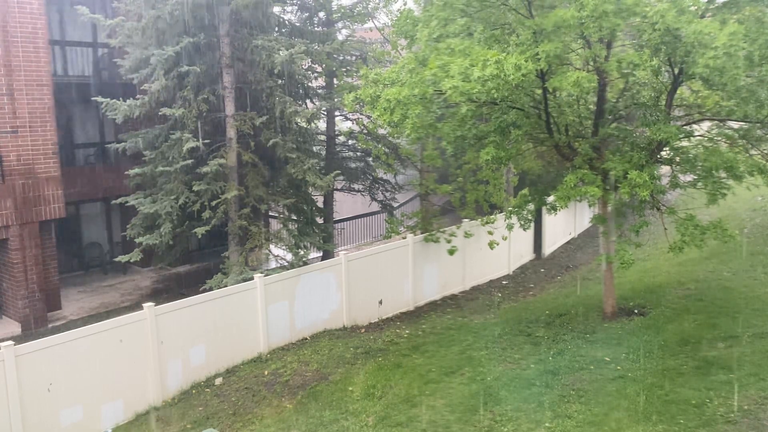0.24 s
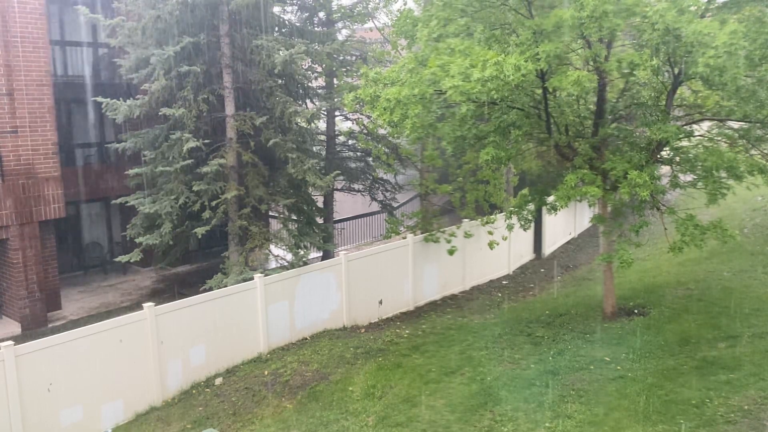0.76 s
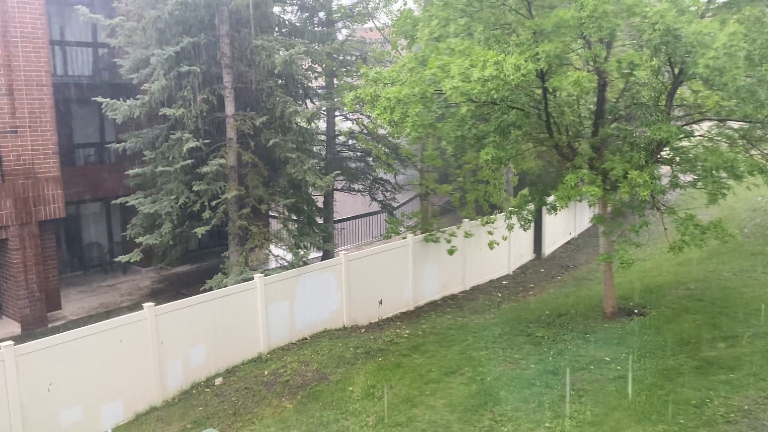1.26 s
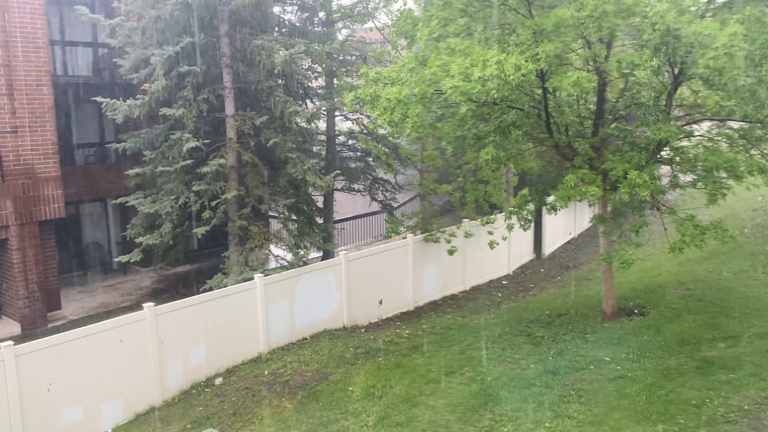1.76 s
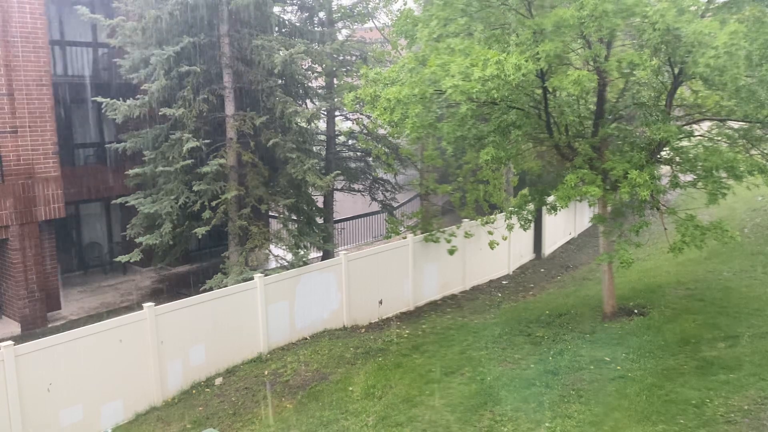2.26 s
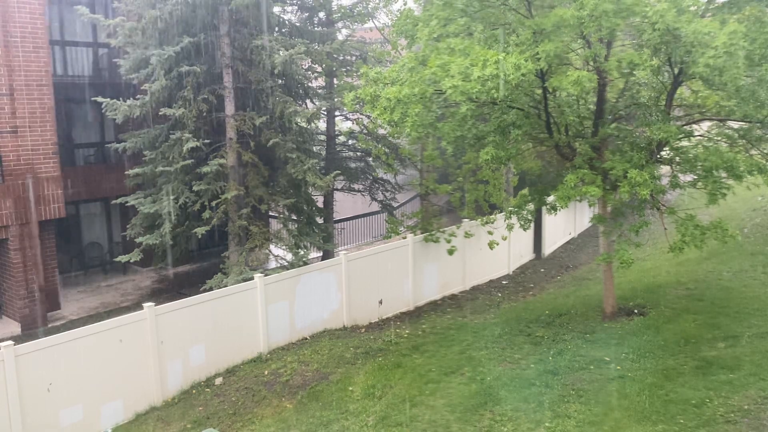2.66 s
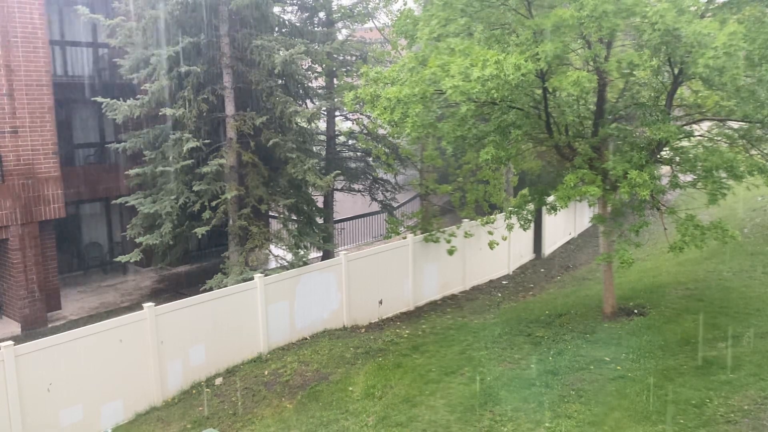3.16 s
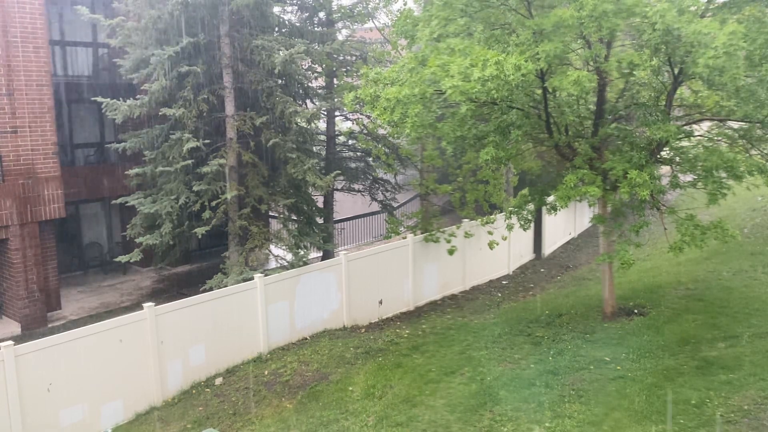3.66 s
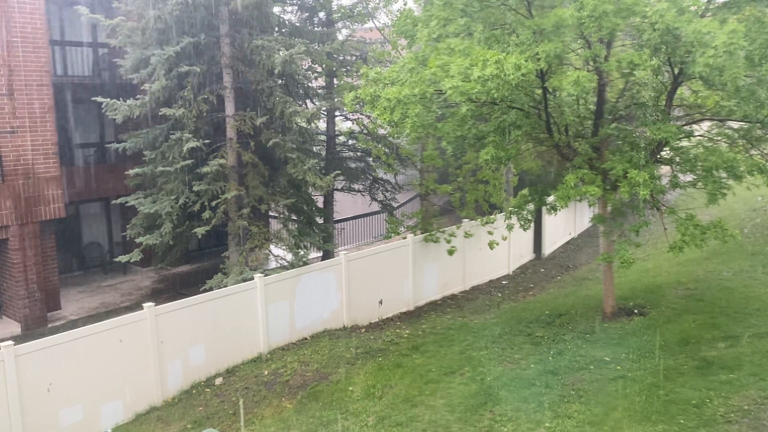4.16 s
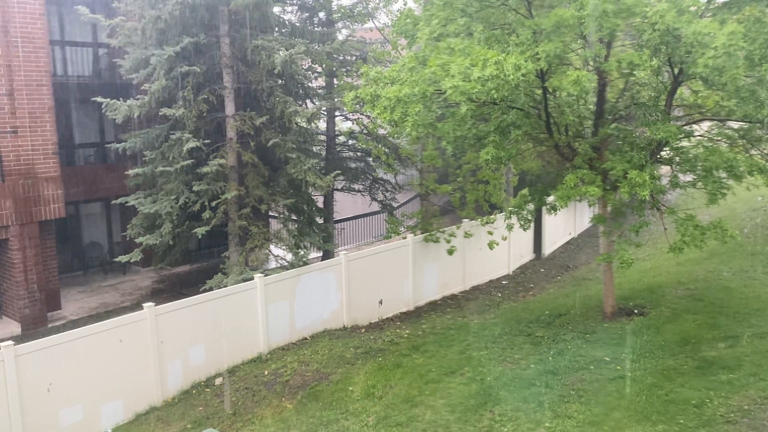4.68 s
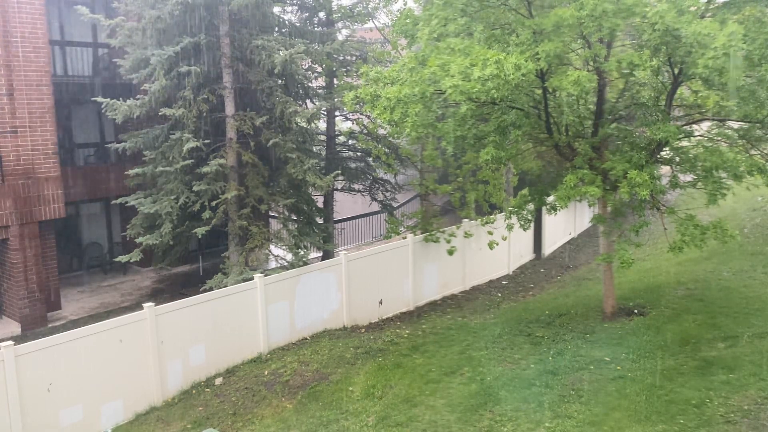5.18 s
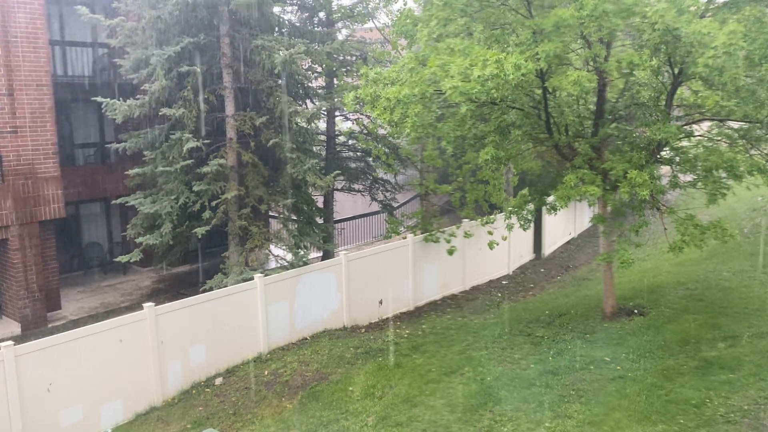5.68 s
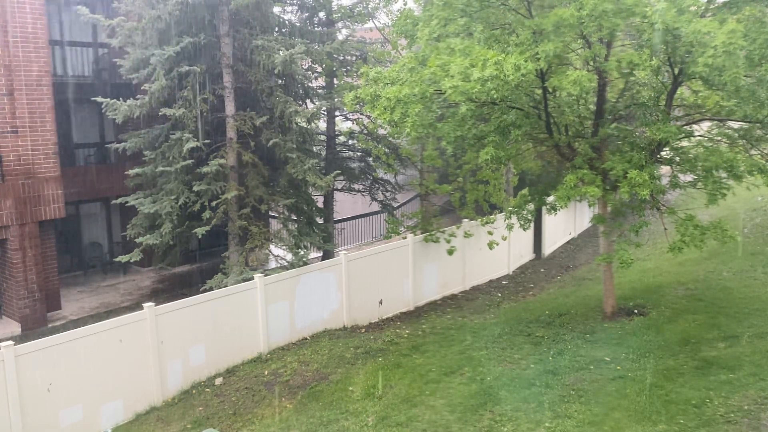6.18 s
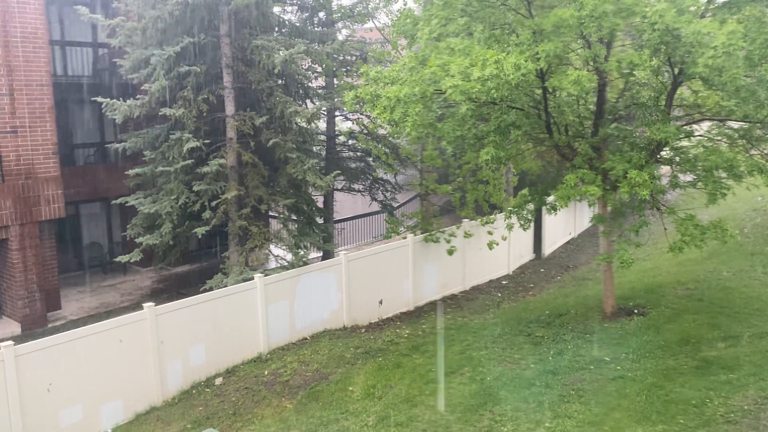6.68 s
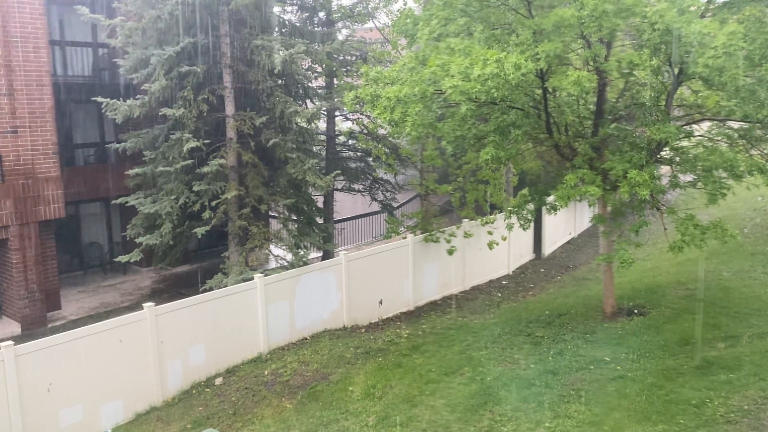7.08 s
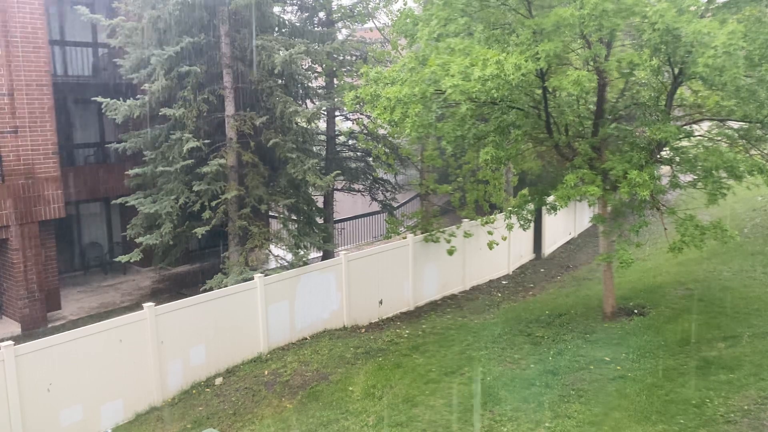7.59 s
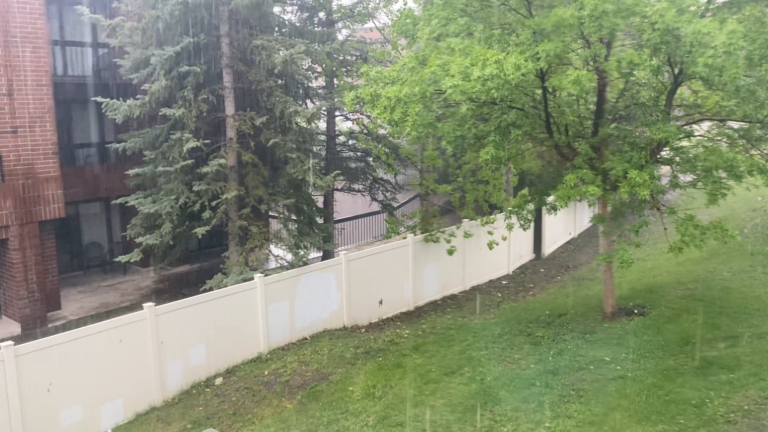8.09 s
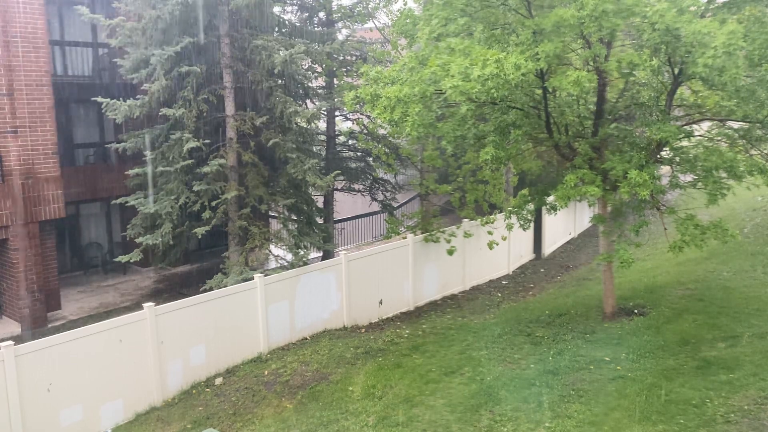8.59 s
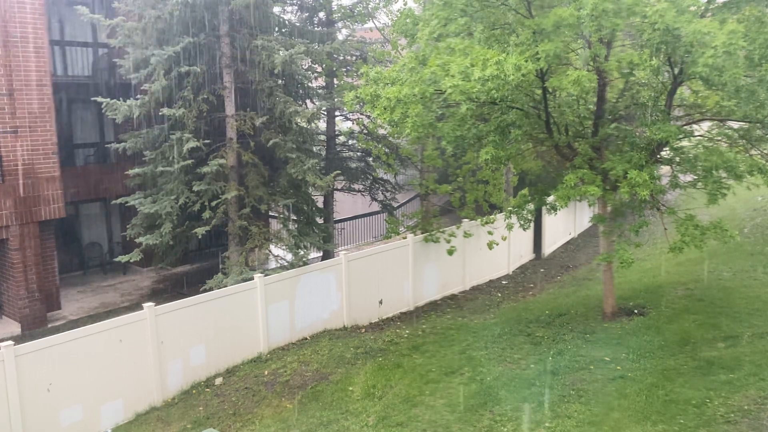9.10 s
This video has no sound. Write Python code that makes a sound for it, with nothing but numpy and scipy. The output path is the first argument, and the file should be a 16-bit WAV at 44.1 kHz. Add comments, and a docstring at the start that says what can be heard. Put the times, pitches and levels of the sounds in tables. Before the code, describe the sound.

A phone above a garden lawn hears continuous rainfall in stereo, slightly hollow in colour. Behind it sits a strong low rumble with brief booms and slow deep swells. Close drops tick and slap at random, clustered at the very start, with a few rising bubble plips through the first five seconds. Late on, a heavy drop knocks resonantly, then a faint thin sizzle passes.

```python
"""Heavy rain on a back garden, heard by a phone above the lawn, over a low town rumble.
Rain and rumble start 2-3 dB high and settle within seconds: filtered noise wash, random patter, noise rumble.
Throughout, close drops knock, slap and spray (damped tones, noise bursts), plips ring and wandering tones boom.
Clear plips come at 1.3-5.0 s, a heavy drop rings its surface at 6.85 s, a thin hiss peaks at 8.24 s.
Hollow resonances colour the rain; the spacing of two microphone ports shapes the stereo of the noise layers."""
import sys
import numpy as np
from scipy import signal
from scipy.fft import rfft, irfft
from scipy.io import wavfile
from scipy.ndimage import uniform_filter1d, map_coordinates

SR = 44100
rng = np.random.default_rng(int(sys.argv[2]) if len(sys.argv) > 2 else 0)


def transcribe(signal):
    """Save signal, clipped to [-1, 1], as a 16-bit WAV file at the path in sys.argv[1]."""
    frames = np.atleast_2d(signal).T
    limited = np.clip(frames, -1, 1)
    pcm = np.round(limited * 32767).astype(np.int16)
    wavfile.write(sys.argv[1], SR, pcm)


N = 412235
TIME = np.arange(N) / SR
HZ = np.maximum(np.arange(N // 2 + 1) * SR / N, 1)


def rain():
    """Far drops merge into a noise wash; duller patter on the lawn and bright patter on leaves join it."""
    # relative spectrum of the rain: (frequency [Hz], level [dB])
    rain_spectrum = [(250, -6), (550, 2.4), (800, -0.5), (1050, -3), (1220, -6.5), (1650, -9),
                     (2550, -11.5), (2800, -11.5), (2950, -15.5), (3300, -16.5), (4400, -22), (5400, -19.5),
                     (6150, -23), (6800, -28), (7900, -24), (8900, -30), (9500, -32.5), (10300, -33),
                     (11200, -33.5)]
    wash = rng.standard_normal((2, N)) * undb(0.25 * walk(9))
    lawn = np.array([patter(per_s=300, spread_db=4.0, largest_db=15.5) for _ in range(2)])
    leaves = np.array([patter(per_s=130, spread_db=5.5, largest_db=16.5) for _ in range(2)])
    # the leaves shed their water in flurries
    leaves = leaves * undb(1.7 * walk(12))
    dull = undb(-3.5) * shape(lawn, resonance(2800, 1900))
    bright = undb(-2.0) * shape(leaves, resonance(7600, 5700))
    coloured = shape(wash + dull + bright, colour(rain_spectrum) * hollow())
    return unit(ports(coloured)) * settle(steady_db=-49, excess_db=2.0, settle_s=2.6)


def patter(per_s, spread_db, largest_db):
    """Drops at random moments, most of them small and a few large, as noise bursts of rms 1."""
    when, size = rng.random((int(per_s * N / SR), 2)).T
    # exponential scatter of mean spread_db, capped
    size_db = np.minimum(-spread_db * np.log(1 - size), largest_db)
    energy = np.bincount((when * N).astype(int), undb(size_db) ** 2, N)
    envelope = splashes(energy, hit_s=0.00024, tail_s=0.025, tail_db=-13.0)
    return unit(envelope * rng.standard_normal(N))


def hollow():
    """Response of the hollow resonances around the microphone, added to the direct sound."""
    # resonances: (centre [Hz], width [Hz], level re direct sound [dB])
    hollow_modes = [(1362, 29, -2), (1950, 67, 1), (2180, 117, 7.5)]
    return 1 + sum(undb(db) * resonance(hz, width_hz) for hz, width_hz, db in hollow_modes)


def close_drops():
    """Near drops knock, rebound, slap and throw a finer spray; walls return the slap duller and later."""
    # relative colour of a slap: (frequency [Hz], level [dB])
    slap_spectrum = [(700, -9), (1600, -4.5), (2400, 3), (3600, 0), (5200, -5.5), (6800, -25), (11000, -29)]
    # relative colour of a spray: (frequency [Hz], level [dB])
    spray_spectrum = [(2500, -12), (4500, -11), (5700, 6), (6700, -3), (7700, 3), (9500, -9), (11300, -23)]
    s, slap_db, spray_db, hz = near_drop_rows()
    first = [s, hz, slap_db + 0.5]
    rebound = [s + 0.001493, hz * 0.87, slap_db - 6.5]
    # the struck surface rings for about one cycle
    knock_rows = np.hstack([first, rebound]).T
    knock = rings(knock_rows, ring_s=0.00036, glide=-0.065, rough=0.079, left_db=2.0)
    slap = drop_bursts(s, slap_db - 3.0, slap_spectrum, hit_s=0.00063, tail_s=0.0092, tail_db=-2.5)
    spray = drop_bursts(s, spray_db + 0.5, spray_spectrum, hit_s=0.00043, tail_s=0.02, tail_db=-4)
    echo = drop_bursts(s + 0.0088, slap_db + 2.0, slap_spectrum, hit_s=0.0078, tail_s=.03, tail_db=-19)
    return knock + slap + spray + shape(echo, resonance(1230, 1300) ** 2)


def near_drop_rows():
    """The closest drops, then lesser random ones whose knock is higher the stronger the spray."""
    # closest drops: (time [s], slap reference level [dB], spray reference level [dB], knock pitch [Hz])
    closest_drops = [(0.0305, -57, -58, 4200), (0.0761, -53, -57, 3900), (0.1583, -45.5, -74, 2950),
                     (0.208, -51, -68, 3200), (0.2706, -53, -66, 3700), (0.3233, -41.5, -62, 4150),
                     (0.3508, -51, -55, 3900), (0.679, -65, -58, 7400), (1.1108, -56, -51, 6800),
                     (1.5077, -51, -65, 3700), (1.5292, -51, -63, 3500), (1.5745, -54, -55, 6800),
                     (1.8823, -52, -66, 4200), (2.838, -47.5, -51.5, 6300), (2.9685, -55, -53, 5600),
                     (3.338, -54, -56, 6000), (3.411, -47, -61, 3000), (3.5588, -53, -55, 5700),
                     (3.8097, -49, -59, 3700), (3.838, -57, -58, 8000), (4.1257, -48, -66, 3200),
                     (4.1466, -53, -68, 2800), (4.26, -51, -66, 3100), (4.447, -50, -70, 3100),
                     (4.5067, -47.5, -58, 3000), (4.528, -50, -58, 2930), (4.9615, -58, -57, 5600),
                     (5.3858, -51, -53.5, 4000), (5.847, -51, -64, 3700), (6.5829, -47.5, -62, 2970),
                     (6.6048, -51.5, -68, 3000), (6.6205, -53, -68, 3800), (6.85, -40.5, -52.5, 3730),
                     (6.9046, -52, -57, 4200), (7.3686, -54, -60, 5900), (7.8872, -48, -62, 2750),
                     (8.4047, -51, -58, 3050), (8.4972, -50, -69, 3580)]
    scatter_db = 4  # either way
    centre_hz, pitch_ratio = 2890, 1.78  # farthest knock above or below the centre
    s, slap, spray = random_drops(per_s=30)
    lesser_slap_db = -59 + scatter_db * slap
    lesser_spray_db = -68.5 + scatter_db * spray
    lesser = [s, lesser_slap_db, lesser_spray_db, centre_hz * pitch_ratio ** spray]
    return np.hstack([np.transpose(closest_drops), lesser])


def drop_bursts(s, db, spectrum, hit_s, tail_s, tail_db):
    """Noisy bursts of one colour at given moments, their grain as the two ports pick it up."""
    energy = np.bincount(np.clip((s * SR).astype(int), 0, N - 1), undb(db) ** 2, N)
    grain = unit(ports(rng.standard_normal((2, N))))
    return shape(splashes(energy, hit_s, tail_s, tail_db) * grain, unit(colour(spectrum)))


def heavy_drop():
    """One heavy drop rings a hollow surface; the low modes bloom later and last longer."""
    # surface modes: (frequency [Hz], level [dB], ring time [s])
    surface_modes = [(960, -52.5, .01), (1400, -56, .007), (3530, -48.5, 0.0014)]
    heavy_s = 6.85
    return sum(rings([(heavy_s, hz, db)], ring_s, glide=-0.017, rough=0.05, left_db=0.5)
               for hz, db, ring_s in surface_modes)


def plips():
    """A trapped bubble rings unsteadily for a few milliseconds, rising as it nears the surface."""
    return rings(plip_rows(), ring_s=0.0023, glide=0.042, rough=0.092, left_db=3.0)


def plip_rows():
    """The clearest plips into standing water, then fainter random ones."""
    # clearest plips: (time [s], pitch [Hz], level [dB])
    clear_plips = [(1.326, 2180, -45), (3.268, 2430, -47), (4.26, 2430, -46), (4.986, 2370, -48)]
    scatter_hz, scatter_db = 100, 3  # either way
    s, pitch, strength = random_drops(per_s=1.2)
    fainter = [s, 2177 + scatter_hz * pitch, -52.5 + scatter_db * strength]
    return np.vstack([clear_plips, np.transpose(fainter)])


def high_hiss():
    """A thin sizzle of dense high-passed-through-resonance grains swells above the rain, then fades faster."""
    peak_s, rise_s, fall_s = 8.24, 0.23, 0.097
    grains = np.array([patter(per_s=500, spread_db=5, largest_db=16) for _ in range(2)])
    air = unit(ports(shape(grains, resonance(10350, 3000) ** 2)))
    return air * swell(peak_s, -70, np.where(TIME < peak_s, rise_s, fall_s))


def town():
    """Low noise rumble of traffic and buildings; it booms unevenly between the house walls."""
    # relative spectrum of the rumble: (frequency [Hz], level [dB])
    town_spectrum = [(22, -59), (33, -39.5), (51, 0.5), (68, -7.5), (80, -5), (96, -9.5), (138, -11),
                     (168, -2.5), (205, -2.5), (243, -1.6), (285, -3.5), (312, -10.5), (380, -9.5),
                     (500, -17.5), (900, -48), (2500, -80)]
    roar = unit(shape(rng.standard_normal((2, N)), colour(town_spectrum)))
    boom = unit(shape(rng.standard_normal((2, N)), resonance(242.9, 27.3) ** 2))
    boom = boom * undb(1.5 * walk(16))
    heave = undb(0.9 * walk(22))
    rumble = unit(ports(roar + undb(-10) * boom) * heave)
    return rumble * settle(steady_db=-41.5, excess_db=3, settle_s=2.1)


def surges():
    """Brief booms of unsteady pitch stand out of the rumble, alike at both ports."""
    # surges: (time [s], level [dB])
    surge_peaks = [(.03, -36), (.125, -40), (.23, -41), (.29, -37), (.355, -40), (.56, -38), (1.14, -40),
                   (1.63, -37.5), (1.69, -38), (1.8, -38.5), (2.24, -44), (2.38, -38.5), (3.54, -40.5),
                   (3.61, -38.5), (4.09, -38.5), (4.27, -40.5), (4.42, -38), (5.94, -44), (7.37, -37.5),
                   (7.76, -39.5), (7.83, -40), (8.79, -40)]
    boom = wandering_tone(239.2, wander_hz=22.05, rate=90)
    return boom * sum(swell(s, db, sigma_s=.015) for s, db in surge_peaks)


def deep_swells():
    """A deep boom of wandering pitch comes and goes under the rumble, alike at both ports."""
    # swells: (time [s], level [dB])
    deep_peaks = [(.75, -44), (1.35, -50), (1.8, -54), (3.18, -47.5), (4.35, -52.5), (5.3, -53),
                  (6.18, -50), (7.0, -48), (9.1, -48)]
    boom = wandering_tone(54, wander_hz=3.39, rate=14)
    return boom * sum(swell(s, db, sigma_s=.11) for s, db in deep_peaks)


def wandering_tone(hz, wander_hz, rate):
    """Sine of rms 1 whose frequency follows a random walk about its centre."""
    return np.sqrt(2) * np.sin(2 * np.pi * np.cumsum(hz + wander_hz * walk(rate)) / SR)


def rings(rows, ring_s, glide, rough, left_db):
    """Damped tones from (time [s], pitch [Hz], level [dB]); the pitch glides and trembles as they fade."""
    t = TIME[:SR // 20]
    out = np.zeros(N + len(t))
    envelope = np.sqrt(2) * t / ring_s * np.exp(1 - t / ring_s)
    bend = glide * (1 - np.exp(-t / ring_s / 2))
    # noise smoothed over 16 samples, restored to a spread near 1
    tremble = uniform_filter1d(rng.standard_normal((len(rows), len(t))), size=16) * np.sqrt(16)
    for (s, hz, db), chance in zip(rows, tremble):
        phase = 2 * np.pi * np.cumsum(hz * (1 + bend + rough * chance)) / SR
        at = min(int(s * SR), N)
        out[at:at + len(t)] += undb(db) * envelope * np.sin(phase)
    return out[:N] * undb(np.array([[left_db], [-left_db]]) / 2)


def splashes(energy, hit_s, tail_s, tail_db):
    """Amplitude envelope of impacts: a brief hit, then a weak tail of droplets and wall echoes."""
    t = TIME[:SR // 4]
    hit = t / hit_s * np.exp(1 - t / hit_s)
    tail = undb(tail_db) * (1 - np.exp(-t / hit_s)) * np.exp(-t / tail_s)
    power = signal.fftconvolve(energy, hit ** 2 + tail ** 2)[:N]
    return np.sqrt(np.maximum(power, 0))


def random_drops(per_s):
    """Moments at exponential random gaps, each with two chance values between -1 and 1."""
    gap, first, second = rng.random((400, 3)).T
    s = np.cumsum(-np.log(1 - gap)) / per_s
    return np.array([s, 2 * first - 1, 2 * second - 1])[:, s < TIME[-1]]


def ports(pair):
    """Two unrelated sounds become one diffuse field as the two spaced ports pick it up."""
    # ports: (frequency [Hz], left minus right [dB], likeness [0-1], lead of the left [rad])
    port_rows = [(60, 0.6, 0.99, 0), (170, 1.5, 0.92, 0.12), (304, 0.5, 0.99, 0.25), (400, 3, 0.14, 0),
                 (473, 1.5, 0, 0), (590, -1.5, 0.39, -3), (717, 2.1, 0.02, -3), (1124, -2, 0.53, -2.5),
                 (1220, 1, 0.2, -1.5), (1330, -0.5, 0.7, -1.5), (1670, 10.5, 0.12, -3),
                 (1830, 6.5, 0.7, -1.5), (1914, 8, 0.3, -2.5), (2066, 7, 0.97, 0.5), (2280, 0.3, 0.99, 0.5),
                 (2850, 5.5, 0.74, -0.8), (3010, 8.5, 0.25, 2), (3220, 7, 0.4, 3), (3640, 5, 0.47, 1),
                 (4320, 1, 0.7, -2), (4760, 2.5, 0, 0.5), (5040, 5, 0.25, 1.8), (5530, 2.8, 0.25, -1.3),
                 (6100, 4.4, 0.4, 0), (6460, 4, 0.33, 1.5), (7000, 1.5, 0.6, -0.9), (7710, 1.5, 0.9, -2),
                 (8350, -1.5, 0.85, -3), (8900, 3, 0.9, -4.5), (9750, 0, 0.77, -6), (10200, -3, 1, -6.5),
                 (10900, 0, 0.55, -7.6)]
    hz, balance_db, likeness, lead_rad = np.transpose(port_rows)
    shared = across(hz, np.clip(likeness, 0, .999)) * np.exp(-1j * across(hz, lead_rad))
    tilt = undb(across(hz, balance_db) / 2)
    a, b = rfft(pair)
    right = shared * a + np.sqrt(1 - abs(shared) ** 2) * b
    # keep the mean power of the two ports
    norm = np.sqrt((tilt ** 2 + tilt ** -2) / 2)
    return irfft(np.array([a * tilt, right / tilt]) / norm, N)


def settle(steady_db, excess_db, settle_s):
    """Gain that starts above its steady level and sinks towards it."""
    return undb(steady_db + excess_db * np.exp(-TIME / settle_s))


def swell(peak_s, db, sigma_s):
    """Gaussian gain that rises smoothly to a peak and falls again."""
    return undb(db) * np.exp(-.5 * ((TIME - peak_s) / sigma_s) ** 2)


def walk(rate):
    """Random knots of unit spread, rate a second, joined by straight lines."""
    knots = rng.standard_normal(1024)
    return map_coordinates(knots, [TIME * rate], order=1, mode="wrap")


def resonance(hz, width_hz):
    """Response of one damped resonator, gain 1 at its centre."""
    return 1 / (1 + 1j * (HZ ** 2 - hz ** 2) / (HZ * width_hz))


def shape(x, response):
    """Filter by a frequency response."""
    return irfft(rfft(x) * response, N)


def colour(rows):
    """Gain over frequency from (frequency [Hz], level [dB]) rows."""
    hz, db = np.transpose(rows)
    return undb(across(hz, db))


def across(hz, values):
    """Join values by straight lines over log frequency."""
    return np.interp(np.log(HZ), np.log(hz), values)


def undb(db):
    """Decibels to gain."""
    return 10 ** (np.asarray(db) / 20)


def unit(x):
    """Scale to rms 1."""
    return x / np.sqrt(np.mean(x ** 2))


def scene():
    """Rain, close drops, plips and a brief sizzle over the town, its surges and its deep swells."""
    drops = close_drops() + heavy_drop() + plips()
    background = town() + surges() + deep_swells()
    return rain() + drops + high_hiss() + background


def record(dry):
    """The phone softens the highest treble, then cuts the top."""
    soft = shape(dry, 1 / np.sqrt(1 + (HZ / 10500) ** 40))
    top_hz, ripple_db, stop_db = 11150, .2, 70
    top_cut = signal.ellip(10, ripple_db, stop_db, top_hz, fs=SR, output="sos")
    return signal.sosfilt(top_cut, soft)


dry = scene()
out = record(dry)
transcribe(out)
```